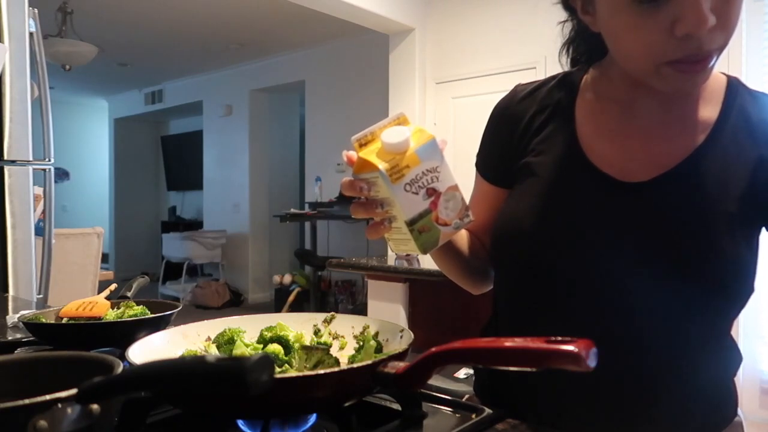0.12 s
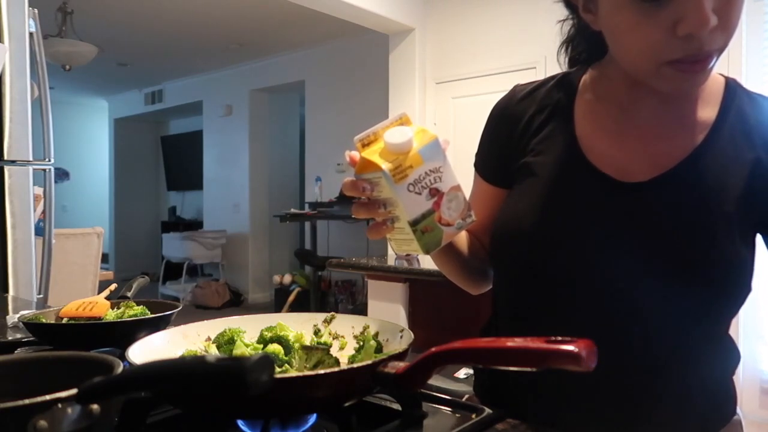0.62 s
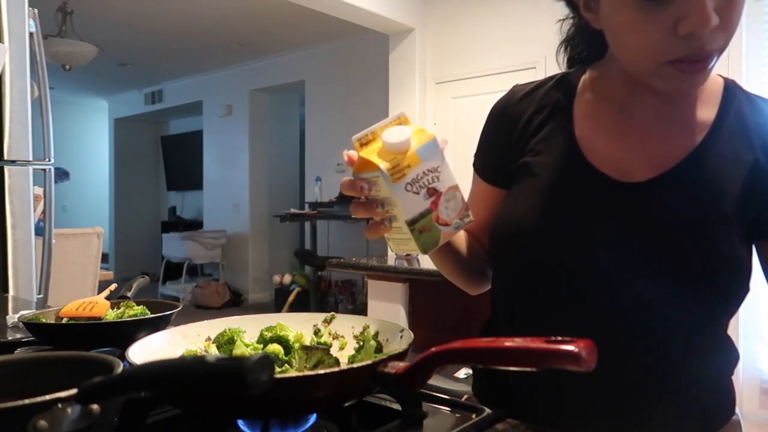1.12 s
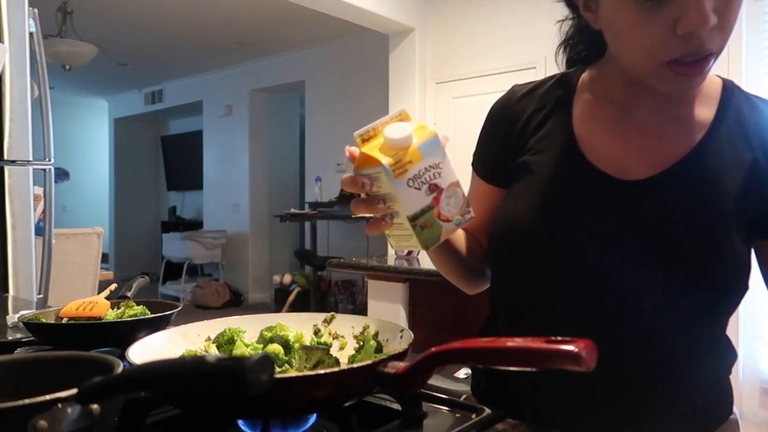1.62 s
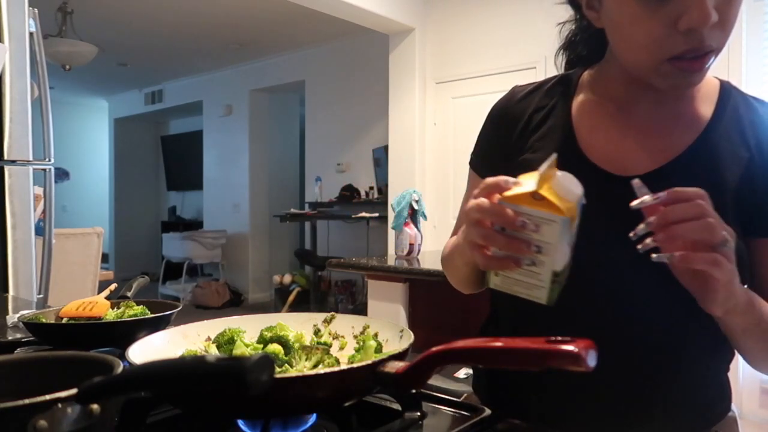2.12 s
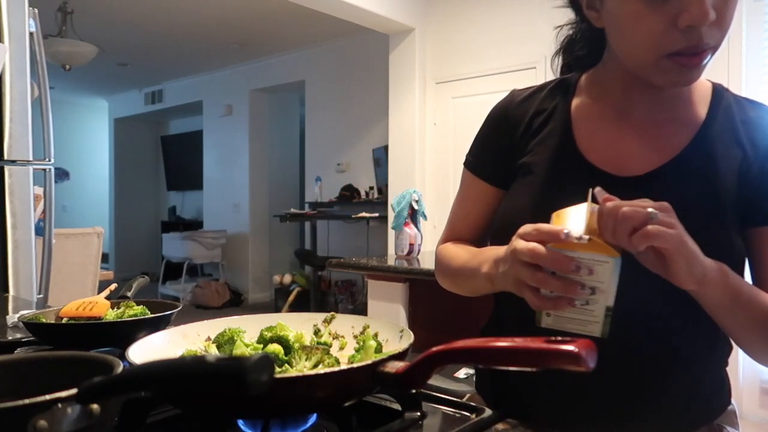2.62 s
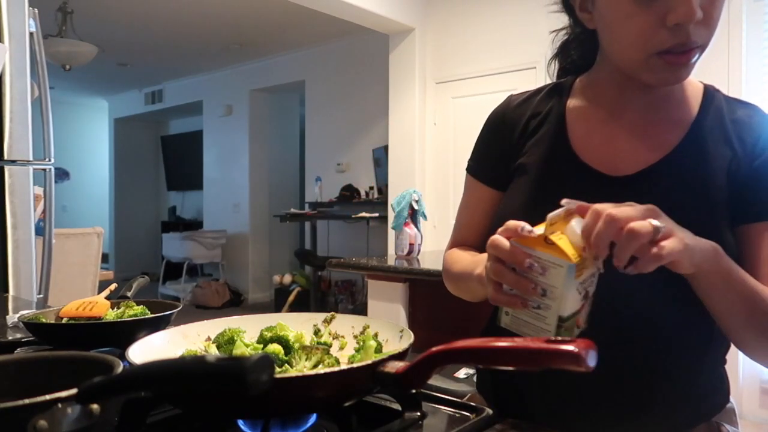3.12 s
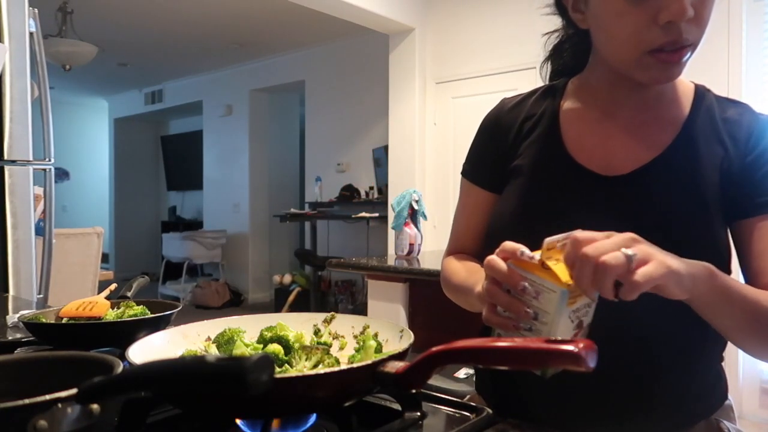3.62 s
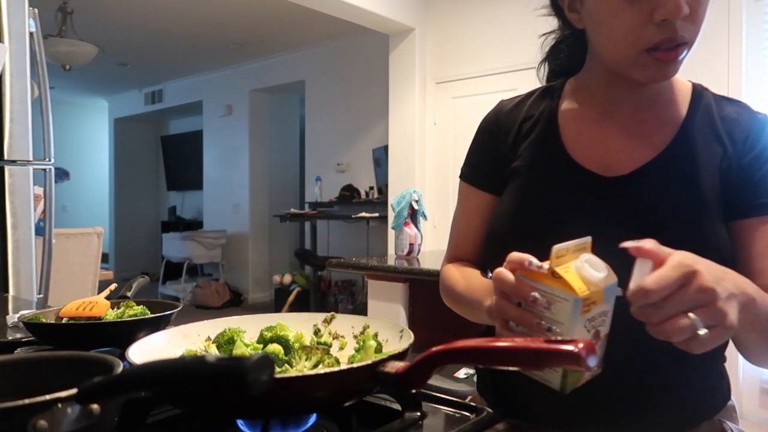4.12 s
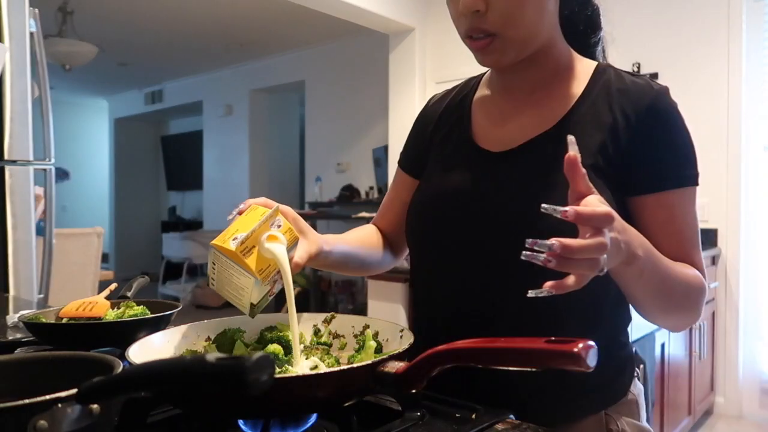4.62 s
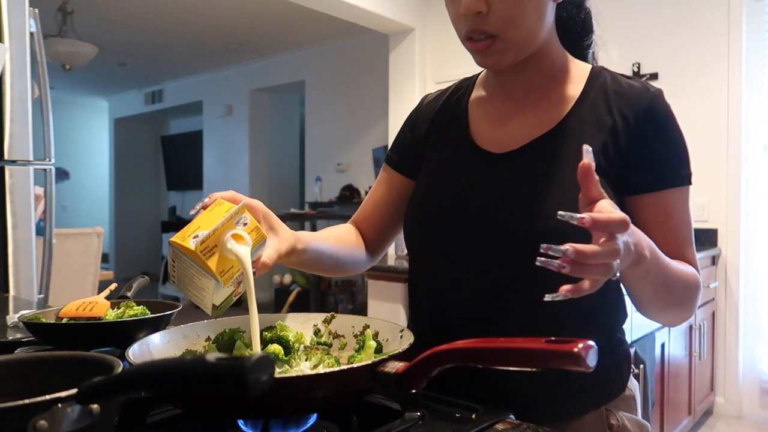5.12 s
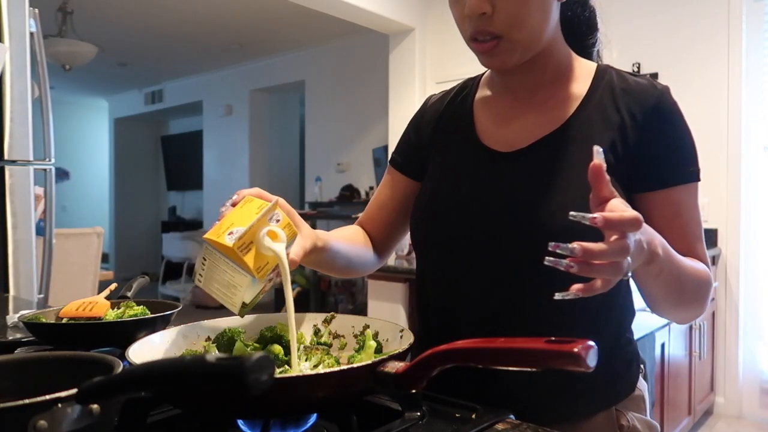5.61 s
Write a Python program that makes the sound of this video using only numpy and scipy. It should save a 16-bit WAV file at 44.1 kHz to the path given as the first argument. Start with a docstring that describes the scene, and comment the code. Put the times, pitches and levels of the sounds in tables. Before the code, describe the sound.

Close to a small stereo microphone in a home kitchen, vegetables fry in a skillet with a fine hiss, dense crackle and irregular sharp pops. A low steady roar, likely gas flame and fan, sits beneath. A few very soft knocks come around four seconds. Near the end, cream lands and the sizzle surges abruptly, wet and metallic, then thickens and eases slightly.

```python
"""Frying vegetables, then cream

Vegetables fry in a skillet on a gas flame, close to a small two-port microphone in a kitchen.
Steam bubbles burst in the fat: random noise makes the hiss, short damped sines the crackle and pops.
Cold cream hits the pan and boils up: swarms of bubbles in three sizes ring the pan's resonances.
A low roar, probably flame and fan, is noise in the room's low resonances; soft knocks are low decaying sines.
The kitchen answers the pan with short random tails."""
import sys
import numpy as np
from scipy import signal
from scipy.fft import rfft, irfft, next_fast_len
from scipy.io import wavfile
from scipy.ndimage import map_coordinates

SR = 44100
rng = np.random.default_rng(int(sys.argv[2]) if len(sys.argv) > 2 else 0)


def gain_from_db(level_db):
    """Convert decibel levels to linear amplitude factors (20 dB per decade)."""
    decades = np.asarray(level_db, float) / 20
    return 10 ** decades


def store_wav(level_fs):
    """Save 16-bit WAV to argv[1]."""
    pcm = np.round(np.clip(np.atleast_2d(level_fs), -1, 1) * 32767)
    wavfile.write(sys.argv[1], SR, pcm.T.astype(np.int16))


N = 253134  # length in samples


def unit(x):
    """Scale to rms 1."""
    return x / np.sqrt(np.mean(x ** 2) + 1e-20)


def along(points, hz):
    """Read (Hz, value) points at any frequency, on a nearly logarithmic axis."""
    f, value = np.transpose(points)
    return np.interp(np.log(hz + 50), np.log(f + 50), value)


def curves(rows):
    """One value per sample for each column after the time."""
    s, *columns = np.transpose(rows)
    return [np.interp(np.arange(N) / SR, s, column) for column in columns]


def wobble(rate):
    """A smooth random curve, with rate random knots a second."""
    knots = rng.standard_normal(N // 100)
    return map_coordinates(knots, [np.arange(N) * rate / SR])


def filtered(x, response):
    """Multiply the spectrum of x by a complex response of frequency."""
    m = next_fast_len(N + SR // 2)
    hz = np.fft.rfftfreq(m, 1 / SR)
    return irfft(rfft(x, m) * response(hz), m)[..., :N]


def causal(points):
    """Minimum-phase response with the given (Hz, dB) gain: nothing sounds before its cause."""
    def response(hz):
        cepstrum = irfft(np.log(gain_from_db(along(points, hz))))
        cepstrum[1:len(hz) - 1] *= 2
        cepstrum[len(hz):] = 0
        return np.exp(rfft(cepstrum))
    return response


def resonant(modes):
    """Causal sum of (Hz, width Hz, dB) resonances, with alternating signs."""
    def response(hz):
        total = 0
        for k, (centre, width, db) in enumerate(modes):
            damping = 1j * hz * width
            total = total + (-1) ** k * gain_from_db(db) * damping / (centre * centre - hz * hz + damping)
        return total
    return response


def bubbles(s, hz, size, cycles, length=160):
    """Damped sines that fall by 1/e in the given cycles; row 1 weights each by its place across the pan."""
    turns = np.arange(length) / SR * hz[:, None]
    rings = size[:, None] * np.sin(2 * np.pi * turns) * np.exp(-turns / cycles)
    at = ((s * SR).astype(int)[:, None] + np.arange(length)).ravel()
    place = rng.uniform(-0.92, 1, (len(s), 1)) * np.sqrt(3)
    return np.array([np.bincount(at, (rings * weight).ravel(), N + SR)[:N] for weight in (1, place)])


def swarm(count, mid_hz, octaves, spread_db, cycles, clumps):
    """Random bursts of varied pitch and size, rms 1 in all, that crowd where the clump curve is high."""
    draw = rng.random((count, 2))
    share = np.cumsum(clumps)
    s = np.interp(draw[:, 0], share / share[-1], np.arange(N) / SR)
    hz = np.clip(mid_hz * 2 ** (octaves * rng.standard_normal(count)), 300, 15000)
    size_db = np.minimum(-spread_db * np.log(draw[:, 1] + 1e-9), 13)
    size = gain_from_db(size_db) * np.sqrt(hz)  # offsets the shorter ring of high bubbles
    return unit(bubbles(s, hz, size, cycles))


# Frying strength: it flares briefly when the cream lands, then the cooled pan fries softer.
# Each row: time in seconds, level in dB.
FRY_LEVEL = [(0.0, -30), (1.3, -30.5), (2.9, -30.5), (4.65, -30.5), (4.89, -28), (5.26, -31), (5.74, -31.5)]
# Colour of the frying at the microphone, shared by the pops.
# Each row: frequency in Hz, gain in dB.
FRY_COLOUR = [(300, -37), (700, -23), (1450, -17), (1800, -4.5), (2200, -2.5), (2750, -4), (3300, -1),
              (4200, -5), (4700, -1.5), (6000, -2.5), (7500, -4.5), (11000, -4), (12500, 0.5),
              (14000, -11.5), (16000, -11.5)]


def frying():
    """A fine hiss under clumps of crackle; droplets boil off in short spurts."""
    level_db, = curves(FRY_LEVEL)
    spurts_db = 0.5 * wobble(18) + 1.1 * wobble(40) + 1.6 * wobble(110)
    hiss = gain_from_db(0.48 * spurts_db) * rng.standard_normal((2, N))
    clumps = gain_from_db(2.1 * spurts_db)
    crackle = swarm(count=7000, mid_hz=6100, octaves=0.85, spread_db=3, cycles=0.75, clumps=clumps)
    return gain_from_db(level_db) * unit(filtered(hiss + 0.7 * crackle, causal(FRY_COLOUR)))


# How long the kitchen's tail lasts.
# Each row: frequency in Hz, time to fall by 60 dB in seconds.
KITCHEN_DECAY = [(300, 0.92), (3000, 0.27), (12000, 0.11)]


def kitchen(x):
    """The room's answer; bursts come from ever new spots, so each stretch has its own random tail."""
    out, step = np.zeros((2, N + SR)), SR // 10
    for at in range(0, N, step):
        hz, t, z = signal.stft(rng.standard_normal((2, SR // 3)), SR, nperseg=128)
        fall = gain_from_db(-60 * t / along(KITCHEN_DECAY, hz)[:, None])
        tail = signal.istft(z * fall, SR, nperseg=128)[1]
        wet = signal.fftconvolve(x[None, at:at + step], tail / np.linalg.norm(tail[0]), axes=1)
        out[:, at:at + wet.shape[1]] += wet
    return out[:, :N]


# Room resonances that the roar fills.
# Each row: frequency in Hz, width in Hz, strength in dB before the roar's overall level is set.
ROAR_MODES = [(57, 16.4, -13.5), (91, 16, -11), (133.7, 10.4, -7), (166.2, 12.7, -3), (240, 51, -4),
              (265, 19, 1.5), (330, 29.7, -7.5), (350.9, 9.8, -2.5), (395.1, 29.6, -4.5),
              (730, 2600, -24.5), (1187, 66, -15), (1371, 18, -18)]
# Each row: time in seconds, level of the roar in dB.
ROAR_LEVEL = [(0, -38.5), (5.1, -38.5), (5.4, -37), (5.74, -36)]


def roar():
    """Turbulence, as noise heard through the room's resonances; it grows a little near the end."""
    level_db, = curves(ROAR_LEVEL)

    def room(hz):
        low = resonant(ROAR_MODES[:-3])(hz) / np.sqrt(1 + (hz / 430) ** 6)  # steep fall above 430 Hz
        return low + resonant(ROAR_MODES[-3:])(hz)

    return gain_from_db(level_db) * unit(filtered(rng.standard_normal((2, N)), room))


# Single pops at set times, faint to loud.
# Each row: start in seconds, level in dB before the frying colour, bubble pitch in Hz,
# and treble crack in dB over that level.
TIMED_POPS = [(0.2155, -12, 3660, -1), (0.2917, -14, 3560, -1), (0.392, -12.5, 4690, 2),
              (0.466, -9.5, 2940, -1), (0.4941, -15, 2810, -1), (0.9468, -13, 3310, -1),
              (0.98, -19, 2350, -1), (1.006, -18, 2220, -1), (1.1128, -14.5, 3330, -1),
              (1.1365, -8.5, 2920, -3), (1.5344, -18, 3330, -1), (1.5454, -11.5, 3600, -1),
              (1.5896, -12.5, 1770, -1), (1.6642, -16, 3370, -1), (1.7504, -12.5, 1750, -1),
              (1.8528, -11, 3570, -1), (1.9589, -18, 2170, -1), (2.0428, -11.5, 2820, -1),
              (2.358, -13, 2990, -1), (2.716, -15, 4680, -1), (2.7511, -12.5, 3000, -1),
              (2.8777, -14.5, 2270, -1), (3.1792, -12, 3340, -1), (3.3471, -20, 2360, -1),
              (3.4077, -17, 3290, -1), (3.4366, -11.5, 5030, -1), (3.676, -12.5, 3870, -1),
              (3.8229, -4, 3380, -7), (3.8726, -13, 2890, -1), (3.882, -20, 3400, -1),
              (4.0696, -15, 3700, -1), (4.0831, -17, 3140, -1), (4.1956, -9, 4940, -1),
              (4.2485, -15, 4610, -1), (4.2737, -9, 3160, -1), (4.3134, -20, 4580, -1),
              (4.4218, -16, 3350, -3), (4.584, -14.5, 2120, -1), (4.6433, -16, 4450, -1),
              (4.6884, -13, 3900, -1), (4.963, -9.5, 2490, -1), (5.1614, -16, 2350, -1),
              (5.2552, -9, 3260, -1), (5.3845, -13, 1620, -1), (5.4321, -8, 1600, -4)]
# small pops fall at random: typical level and spread in dB before the colour, middle pitch, pitch spread
SMALL_DB, SMALL_SPREAD_DB, SMALL_HZ, SMALL_OCTAVES = -21.5, 3.5, 3270, 0.4
# parts of a pop, dB over its level: the ring, and the treble crack of a small pop
RING_DB, SMALL_CRACK_DB = 4.5, -1
# spatter: dB after a 0 dB pop (before the colour), share of the pop's dB it follows, time to fall by 60 dB
SPATTER_DB, SPATTER_FOLLOWS, SPATTER_T60_S = -15, 0.66, 0.06


def pops():
    """Each pop is a short ring at its bubble pitch, a sharp treble crack and a dying spatter of fat."""
    draw = rng.standard_normal((50, 2))
    small = [rng.random(len(draw)) * N / SR,
             SMALL_DB + SMALL_SPREAD_DB * draw[:, 0],
             SMALL_HZ * 2 ** (SMALL_OCTAVES * draw[:, 1]),
             np.full(len(draw), SMALL_CRACK_DB)]
    s, db, hz, crack_db = np.hstack([np.transpose(TIMED_POPS), small])
    ring = bubbles(s + 0.0006, hz, gain_from_db(RING_DB + db), cycles=1.0)
    crack = bubbles(s + 0.00038, np.full(len(s), 9000.), gain_from_db(crack_db + db), cycles=0.87)
    starts = np.bincount((s * SR).astype(int), gain_from_db(SPATTER_DB + SPATTER_FOLLOWS * db), N)
    fall = gain_from_db(-60 * np.arange(SR // 4) / SR / SPATTER_T60_S)
    dying = signal.fftconvolve(starts, fall)[:N]
    drops = swarm(count=30000, mid_hz=5270, octaves=0.93, spread_db=1.5, cycles=0.84, clumps=np.ones(N))
    return filtered(ring + crack + dying * drops, causal(FRY_COLOUR))


# Soft knocks.
# Each row: start in seconds, level in dB before the slow start and the decay, pitch in Hz,
# and time to fall by 60 dB in seconds.
THUDS = [(3.944, -29, 840, 0.054), (4.29, -28, 165, 0.15), (4.48, -26, 265, 0.16)]


def thuds():
    """Soft contacts with no crack: a low ring with a slow start."""
    out, t = np.zeros(N + SR), np.arange(SR // 4) / SR
    for s, db, hz, t60 in THUDS:
        swell_in = 1 - np.exp(-t / 0.0096)
        ring = gain_from_db(db - 60 * t / t60) * np.sin(2 * np.pi * hz * t)
        out[round(s * SR):][:len(t)] += swell_in * ring
    return out[:N]


def boil_db(from_s, db, rise, swell, swell_s, fade):
    """Level that climbs to the boil, drifts slowly while cream spreads, then fades as the pan cools."""
    t = np.arange(N) / SR - from_s
    climb = rise * np.minimum(t, 0)
    return db + climb + swell * np.clip(t, 0, swell_s) - fade * np.maximum(t - swell_s, 0)


# Cream boiling up, one row per bubble size, small to large.
# Each row: start of the boil in seconds, level then in dB, rise before it in dB per second,
# swell after it in dB per second (below 0 it sinks), length of the swell in seconds, fade in dB per second.
CREAM_BOIL = [(4.678, -31.5, 119, 13, 0.24, 19), (4.865, -30.5, 120, -3.5, 0.42, 5.5),
              (4.873, -43.5, 74, 7, 0.55, 22)]
# Resonances of the pan under the cream.
# Each row: frequency in Hz, width in Hz, strength in dB before the overall level is set.
PAN_MODES = [(484, 56, -12), (567, 74, -12), (645, 38, -12.5), (826, 48, -1.5), (1220, 75, -5),
             (1340, 45, -5), (1770, 165, -1.5), (2150, 170, -3), (2490, 235, -1), (3035, 72, 0.5),
             (3350, 320, -1.5), (3950, 350, 1), (4490, 300, 1.5), (6100, 880, 2)]
# the low ring sags as the pool deepens
SAG_FROM_S, SAG_TAKES_S = 5.1, 0.32


def cream():
    """Flash boiling: small bubbles first, larger and duller ones as the pool deepens, all ringing the pan."""
    small_db, middle_db, large_db = [boil_db(*row) for row in CREAM_BOIL]
    churn = gain_from_db(1.2 * wobble(30) + 2.4 * wobble(90))
    small = swarm(count=30000, mid_hz=4160, octaves=0.46, spread_db=-0.5, cycles=1.56, clumps=churn)
    middle = swarm(count=24000, mid_hz=2120, octaves=0.35, spread_db=2.5, cycles=1.85, clumps=churn)
    large = swarm(count=5000, mid_hz=805, octaves=0.46, spread_db=3.0, cycles=0.36, clumps=churn)

    def ring(x, lower=1):
        """The pan's ring, with its resonances divided by lower."""
        return unit(filtered(x, lambda hz: resonant(PAN_MODES)(hz * lower)))

    # the sag is a crossfade to a slightly lower ring
    sag = np.clip((np.arange(N) / SR - SAG_FROM_S) / SAG_TAKES_S, 0, 1)
    gurgle = np.sqrt(1 - sag) * ring(large) + np.sqrt(sag) * ring(large, lower=1.075)
    return gain_from_db(small_db) * ring(small) + gain_from_db(middle_db) * ring(middle) + gain_from_db(large_db) * gurgle


def scene():
    """Row 0 reaches both ports alike; row 1 is the part that is opposite at the ports."""
    pan = frying() + pops() + cream()
    return pan + gain_from_db(-10) * kitchen(pan[0]) + roar() + thuds() * [[1], [0]]


def band_limit(x):
    """A steep low-pass at the top of the band."""
    return signal.sosfilt(signal.butter(12, 15850, fs=SR, output="sos"), x)


# How far the left port leads the right.
# Each row: frequency in Hz, lead in radians.
LEFT_LEAD = [(3000, 0), (4600, 0.5), (5200, 1), (6500, 1.32), (8600, 2.3), (10500, 2.3), (11500, 2.9),
             (13400, 2.65)]
# How alike the two ports hear the sound.
# Each row: frequency in Hz, likeness from 0 to 1.
LIKENESS = [(100, .99999), (250, .9995), (430, 0.99), (700, 0.9), (1150, 0.96), (1800, 0.99), (3000, 0.99),
            (4500, 0.83), (6500, 0.57), (8000, 0.43), (9500, 0.34), (12000, 0.81), (13500, 0.87)]
# the left port is slightly more sensitive
LEFT_DB = 0.19


def record(dry):
    """The ports agree in the bass; in the treble the left one leads and they part."""
    def shares(hz):
        turn = np.arccos(np.clip(along(LIKENESS, hz), 0, 1)) / 2
        return np.array([np.cos(turn), np.sin(turn)])

    def lead(hz):
        return np.exp(0.5j * along(LEFT_LEAD, hz) * [[1], [-1]])

    alike, apart = filtered(dry, shares)
    ports = filtered(np.array([alike + apart, alike - apart]), lead)
    return band_limit(ports * gain_from_db([[LEFT_DB], [0]]))


dry = scene()
out = record(dry)
store_wav(out)
```